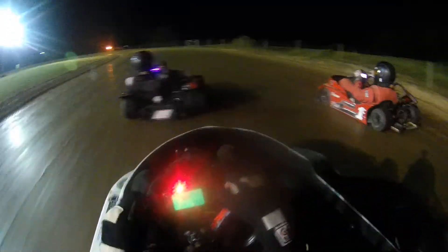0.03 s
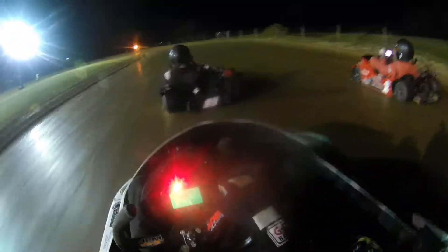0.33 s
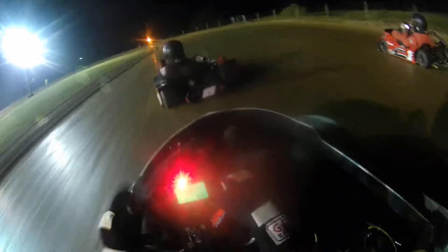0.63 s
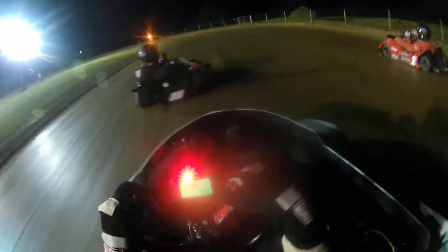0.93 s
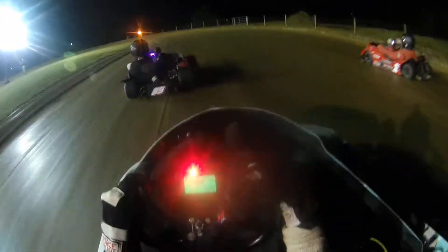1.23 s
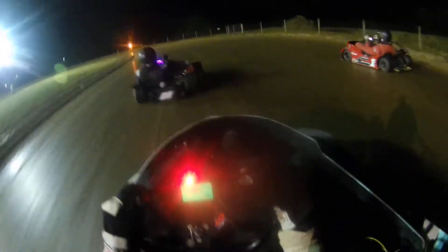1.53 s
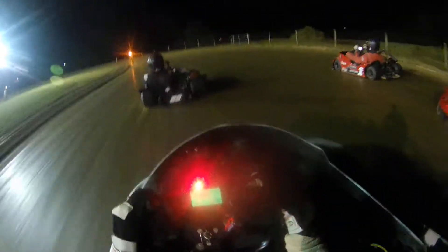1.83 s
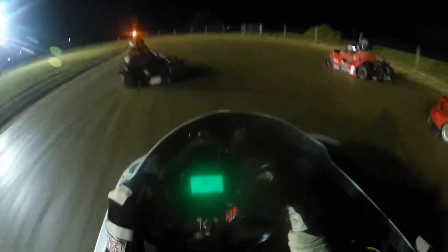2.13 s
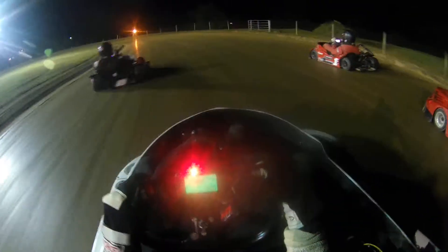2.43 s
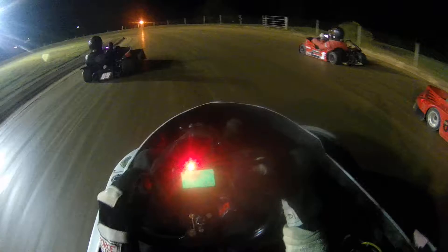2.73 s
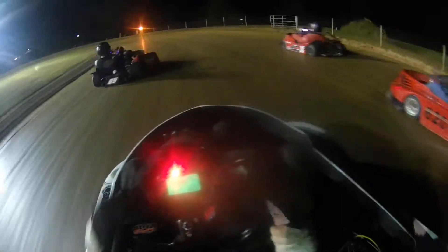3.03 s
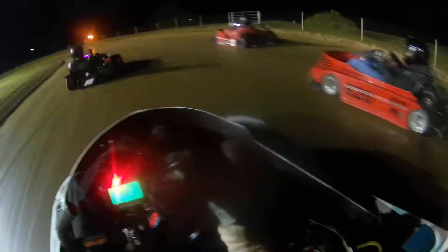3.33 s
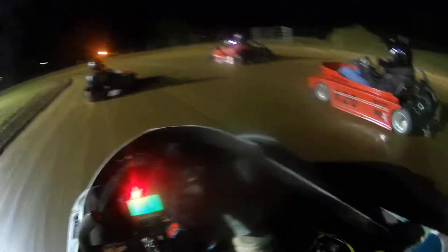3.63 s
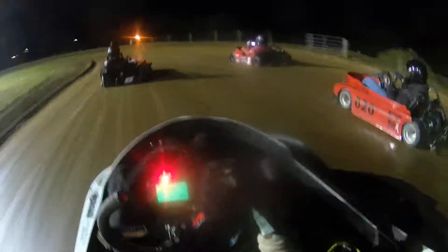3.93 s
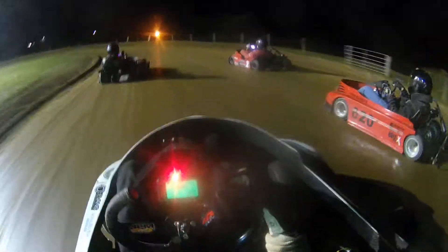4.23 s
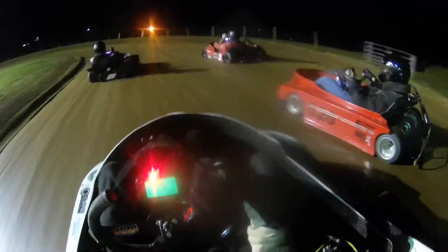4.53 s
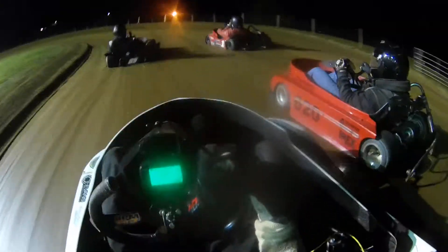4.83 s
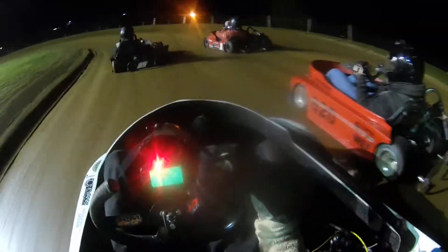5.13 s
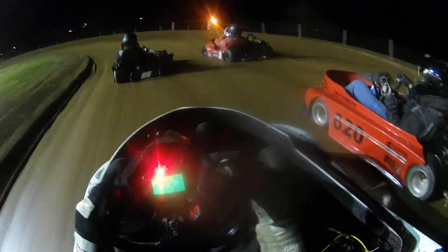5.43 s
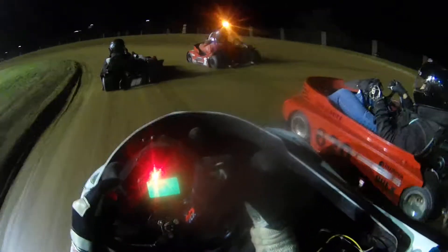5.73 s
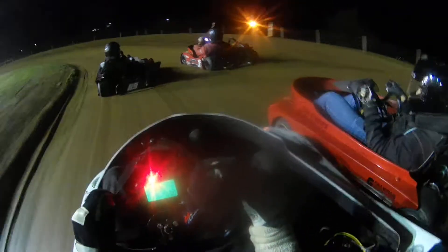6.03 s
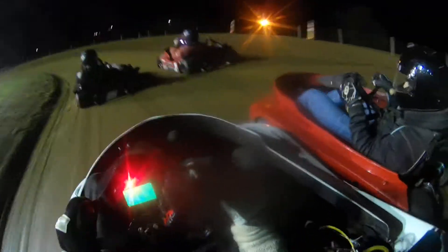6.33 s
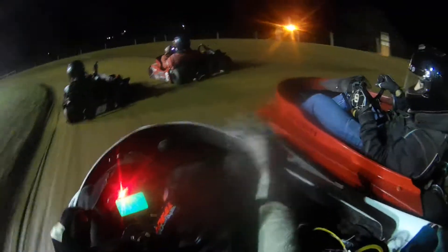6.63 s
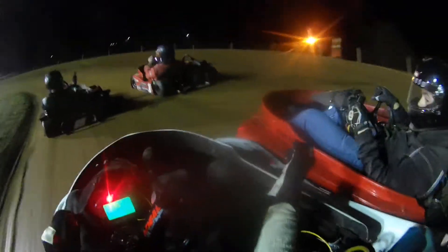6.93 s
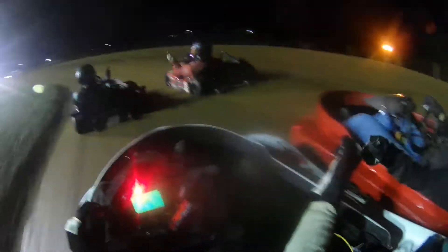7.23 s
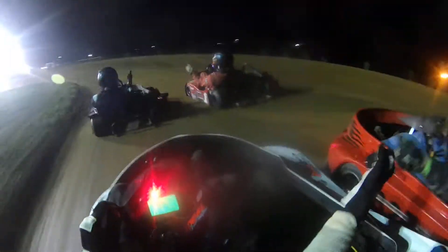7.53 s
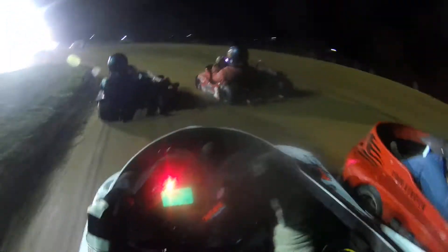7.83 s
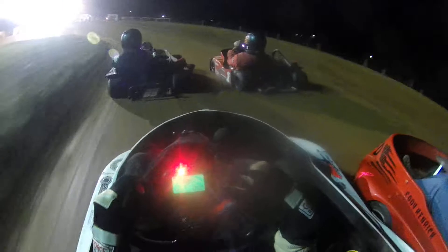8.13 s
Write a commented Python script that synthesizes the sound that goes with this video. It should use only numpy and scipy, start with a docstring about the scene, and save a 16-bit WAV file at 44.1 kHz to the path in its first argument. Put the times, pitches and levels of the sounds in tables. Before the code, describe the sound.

Loud, low wind buffeting drones on a helmet microphone for the whole eight seconds, overloaded and distorted, as a go-kart races on a dirt track. Underneath, its single-cylinder engine throbs, easing around 2.3, 5.8 and 7.5 seconds and picking up again each time. A rival kart's engine swells alongside at about 5.3 and 6.4 seconds, drops back, then returns at the end. Air and tyres add a fluttering hiss, and a faint, thin metallic sizzle comes and goes, clearest near 1.5 and 3.5 seconds. Gusts slap the microphone with short irregular pops, strongest around 2.6, 3.6, 5.3 and 6.5 seconds. Fine dirt ticks lightly against the microphone throughout, with small clusters near 2.8 and 5.2 seconds. The wind softens slightly between 7 and 7.7 seconds, then surges and rises in pitch just after 8 seconds.

```python
"""Heavy, droning wind buffeting on a driver's helmet camera in a night kart race on a dirt oval.
Under it throbs the kart's single-cylinder four-stroke; a rival draws alongside and throws grit.
Air and tyres hiss, a thin sizzle comes and goes, and bursts of wind slap the microphone.
The input is overdriven throughout: the buffeting is squared off, and finer sound
slips through only near its zero crossings."""
import sys
import numpy as np
from scipy import signal
from scipy.fft import rfft, irfft, next_fast_len
from scipy.io import wavfile
from scipy.ndimage import uniform_filter1d, map_coordinates

SR = 44100
rng = np.random.default_rng(int(sys.argv[2]) if len(sys.argv) > 2 else 0)


def materialize(psi):
    """Save the field psi as 16-bit PCM at rate SR to the path in sys.argv[1].

    A 1-D psi becomes a single channel; in a 2-D psi each row is a channel.
    """
    bounded = np.clip(np.atleast_2d(psi).T, -1, 1)
    quanta = np.round(bounded * 32767).astype(np.int16)
    wavfile.write(sys.argv[1], SR, quanta)


N = 369116
TIME = np.arange(N) / SR

# Table levels are relative.
# airflow over the helmet; drives buffeting, rush, spray and hiss: t/s, level/dB
HELMET_AIRFLOW = [(0, 2), (.55, -3.5), (1.38, 1), (2.05, 1.5), (2.3, -5.5), (2.7, 3.5), (3.5, -1), (4.2, 1),
                  (4.45, -1), (5.0, -1), (5.2, 2), (5.4, 1), (5.6, -6), (6.05, -4.5), (6.62, 2.5),
                  (7.1, -5), (7.72, -5.5), (8.08, 5), (8.37, 0)]
# eddy tone, holding or breaking up, climbing at the end: t/s, f/Hz, level/dB
EDDY_TONE = [(0, 175.6, -2), (.12, 170.2, 4), (.3, 165.9, 1), (.54, 154.9, 2), (.75, 206, -1.5),
             (.86, 159.8, -4), (1.08, 197.4, 1.5), (1.16, 152.7, 2.5), (1.3, 194.7, -2), (1.43, 209.5, 0),
             (1.52, 170.3, -0.5), (1.88, 155, 3.5), (2.0, 185.5, -4), (2.15, 210.2, 0), (2.28, 158, -2),
             (2.6, 171.8, -1), (2.9, 188.1, -1), (3.08, 159.4, -2), (3.19, 198, 0), (3.28, 168.2, 0.5),
             (3.5, 208, -1.5), (3.65, 171.8, 0), (3.96, 160.5, -1), (4.05, 195.2, 3.5), (4.28, 194.3, 1),
             (4.42, 158.2, -6.5), (4.85, 152.2, -1.5), (5.08, 175.9, -1.5), (5.25, 174.9, -3.5),
             (5.42, 199.5, -1.5), (5.6, 158, -7), (5.92, 170.2, 0), (6.2, 168, -5.5), (6.5, 168.2, -3.5),
             (6.62, 185, 1), (6.74, 188, -0.5), (6.86, 152.4, -1.5), (7.1, 160.2, -9), (7.4, 150, -8.5),
             (7.62, 177.9, -3.5), (7.82, 138.1, -2.5), (8.05, 173.9, -1.5), (8.22, 198.6, -4.5),
             (8.29, 224, 3), (8.37, 225.5, 5)]
# turbulence at the eddy rate EDDY_REF_HZ: f/Hz, level/dB
TURBULENCE_SPECTRUM = [(15, -22.5), (40, -18.5), (75, -15), (100, -6), (125, -1.5), (165, -2), (205, -1.5),
                       (250, -13.5), (340, -16), (500, -39.5), (900, -60)]
EDDY_REF_HZ = 170.94
# large slow eddies: f/Hz, level/dB
RUMBLE_SPECTRUM = [(15, -10), (45, -8.5), (75, -3.5), (100, 0.5), (120, -1), (170, -20.5), (400, -70.5)]
# air and tyre rush: f/Hz, level/dB
RUSH_SPECTRUM = [(100, -1.5), (300, 9), (480, -6), (700, -15), (1150, -3.5), (2000, -17), (3000, -16),
                 (4500, -29), (6000, -23), (8000, -42), (9900, -25), (12000, -40), (16000, -59)]
# own engine's firing rate, easing and picking up: t/s, f/Hz
OWN_FIRING = [(0, 33.5), (.3, 33.2), (.65, 31.6), (1.45, 34.3), (1.75, 33.0), (2.3, 28.5), (3.5, 34.1),
              (4.3, 32.5), (4.65, 30.1), (5.35, 31.2), (5.8, 29.0), (6.5, 31.3), (7.2, 29.4), (7.7, 29.0),
              (8.37, 32.5)]
# rival's firing rate and level, drawing alongside and dropping back: t/s, f/Hz, level/dB
RIVAL_FIRING = [(0, 31.7, -10.5), (2.4, 25.2, -6), (3.2, 28, -4.5), (5.0, 29.6, -4.5), (5.3, 26, 4),
                (5.65, 25.9, -6.5), (6.4, 28, 1), (7.5, 25.1, -12.5), (8.37, 25.8, 3.5)]
# exhaust note: multiple of the firing rate, level/dB
EXHAUST_ORDERS = [(1, -11), (2, -1), (3, -10.5), (4, -1), (5, 0), (6, 0.5), (7, -11), (8, -9.5), (9, -15),
                  (10, -13), (15, -13.5), (16, -22)]
# exhaust rasp: f/Hz, level/dB
RASP_SPECTRUM = [(150, -11), (390, 2), (495, 5.5), (620, -8), (900, -9), (1300, 1.5), (2000, -11.5),
                 (3000, -17), (5000, -31.5), (8000, -37.5), (10000, -37), (15000, -51)]
# sizzle envelope: t/s, level/dB
SIZZLE_LEVEL = [(0, -1), (.8, -2), (1.5, 4), (2.05, -2), (2.4, -12), (3.0, -3), (3.5, 4.5), (4.3, 0),
                (4.9, -1.5), (6.5, -1.5), (7.3, -8), (8.37, -2)]
# sizzle colour: f/Hz, level/dB
SIZZLE_SPECTRUM = [(6500, -37), (8700, -14), (9900, 0), (11000, -5), (12500, -17), (16000, -25)]
# sharpest slaps of wind, heard as short pops: t/s, level/dB, f/Hz
WIND_SLAPS = [(0.029, -16.5, 1470), (0.443, -19, 800), (1.044, -10, 1030), (1.361, -12, 1400),
              (1.3903, -15, 1240), (1.5673, -3, 1121), (1.926, -8, 1584), (2.012, -8.5, 794),
              (2.522, -1, 870), (2.5564, -16, 1145), (2.589, 2, 800), (2.659, -17, 1130),
              (2.6925, -10, 1225), (2.845, -14, 1810), (2.949, -9, 1475), (3.1746, -18, 1263),
              (3.419, -7, 852.6), (3.595, 2.5, 1251), (3.9218, -14, 1200), (3.9511, -4.5, 1283),
              (4.6895, -9, 1466), (5.1231, -11, 1673), (5.1861, -10, 1370), (5.296, 1, 807.3),
              (5.319, 0.5, 1500), (5.3668, -14, 1600), (5.417, -10, 810), (6.3227, -4, 1049),
              (6.4232, -5, 1114), (6.5772, -3, 1272), (6.6734, -7, 1274), (7.5919, -13, 1089),
              (8.1058, -15, 1403), (8.1426, -4, 1359), (8.202, -13, 850), (8.3543, -17.5, 1289)]
# grit hitting the camera: t/s, level/dB
GRIT_HITS = [(.178, -30), (1.925, -31), (2.752, -28), (2.783, -30), (4.211, -30), (4.821, -31),
             (5.156, -28), (5.185, -28), (5.344, -27), (7.32, -27), (7.514, -32)]
# hiss over the clipped tops: f/Hz, level/dB
HISS_SPECTRUM = [(500, 3), (2000, 3), (4000, -11), (8000, -11), (10000, -10), (12000, -14), (15500, -5.5)]
# response after the input stage: f/Hz, level/dB
TREBLE_RESPONSE = [(5000, -1.5), (8000, -5), (10000, -4), (12000, -8.5), (15500, -11.5)]


def gain_of(db):
    """Decibels to amplitude."""
    return 10 ** (np.asarray(db) / 20)


def unit_rms(x):
    """Scales to rms 1."""
    return x / np.sqrt(np.mean(x ** 2) + 1e-20)


def follow(table):
    """A time table's columns, interpolated to every sample."""
    times_s, *columns = np.transpose(table)
    return [np.interp(TIME, times_s, column) for column in columns]


def filtered(x, spectrum):
    """Filters x by a spectrum table, interpolated in log frequency."""
    size = next_fast_len(N + 2000)
    bins_hz = np.fft.rfftfreq(size, 1 / SR)
    hz, db = np.transpose(spectrum)
    response_db = np.interp(np.log(bins_hz + 1), np.log(hz + 1), db)
    return irfft(rfft(x, size) * gain_of(response_db), size)[:N]


def noise(spectrum):
    """Coloured noise, rms 1."""
    return unit_rms(filtered(rng.standard_normal(N), spectrum))


def wander(rate_hz):
    """Smooth random drift, rms 1, rolling off at rate_hz."""
    size = next_fast_len(N)
    lowpass = np.exp(-(np.fft.rfftfreq(size, 1 / SR) / rate_hz) ** 2)
    return unit_rms(irfft(rfft(rng.standard_normal(size)) * lowpass, size)[:N])


def add(mix, start_s, sound):
    """Adds sound into mix at start_s."""
    part = mix[round(start_s * SR):][:len(sound)]
    part += sound[:len(part)]


def buffeting(tone_db=-6, turbulence_db=-4.5, gust_rate_hz=7, sway_hz=3, jitter_hz=7):
    """Eddies shed from the camera: a drone in a band of turbulence that moves with it."""
    flow_db, = follow(HELMET_AIRFLOW)
    steady_hz, firmness_db = follow(EDDY_TONE)
    eddy_hz = steady_hz + sway_hz * wander(gust_rate_hz)
    level_db = 7 + 0.4 * flow_db + 0.52 * wander(gust_rate_hz)
    turns = np.cumsum(eddy_hz + jitter_hz * wander(25)) / SR
    tone = gain_of(tone_db + firmness_db) * unit_rms(np.sin(2 * np.pi * turns))
    read_at = np.cumsum((eddy_hz / EDDY_REF_HZ) ** 0.3)  # faster air sweeps turbulence past sooner
    turbulence = map_coordinates(noise(TURBULENCE_SPECTRUM), [read_at], order=1, mode="mirror")
    return gain_of(level_db) * (tone + gain_of(turbulence_db) * turbulence)


def rumble(start_db=-11.5, rise_db_per_s=1.26):
    """Large slow eddies below the buffeting, growing through the bend."""
    return gain_of(start_db + rise_db_per_s * TIME) * noise(RUMBLE_SPECTRUM)


def rush(level_db=-16, flutter_db=2):
    """Fluttering hiss of air and tyres; the microphone port rings near 10 kHz."""
    flow_db, = follow(HELMET_AIRFLOW)
    return gain_of(level_db + flow_db + flutter_db * wander(43)) * noise(RUSH_SPECTRUM)


def wind(gust_db=2.9, rush_share=0.12):
    """Quick gusts swell buffeting and rumble together, the rush slightly."""
    swell_db = gust_db * wander(55)
    return gain_of(swell_db) * (buffeting() + rumble()) + gain_of(rush_share * swell_db) * rush()


def engine(firing_hz, level_db, note_db, rasp_db, puff_cycles, unevenness):
    """One cylinder: low exhaust orders plus a rasping gas puff per firing."""
    cycles = np.cumsum(firing_hz * (1 + unevenness * wander(12.03))) / SR
    note = sum(gain_of(db) * np.cos(2 * np.pi * (order * cycles + rng.random()))
               for order, db in EXHAUST_ORDERS)
    puffs = np.exp(-(cycles % 1) / puff_cycles) * gain_of(2 * wander(30))
    rasp = filtered(puffs * rng.standard_normal(N), RASP_SPECTRUM)
    return gain_of(level_db) * (gain_of(note_db) * unit_rms(note) + gain_of(rasp_db) * unit_rms(rasp))


def sizzle(level_db=-42, flutter_db=3):
    """Thin metallic sizzle near 10 kHz, probably the drive chain."""
    swell_db, = follow(SIZZLE_LEVEL)
    return noise(SIZZLE_SPECTRUM) * gain_of(level_db + swell_db + flutter_db * wander(40))


def slapped(sound, gain_db=3, width_s=0.0006, choke_s=0.0011, raggedness=0.12):
    """Each wind slap briefly chokes the microphone port and adds one ragged pressure swing."""
    swings, choke = np.zeros(N), np.zeros(N)
    t = np.arange(-220, 220) / SR
    for at_s, level_db, hz in WIND_SLAPS:
        crack = unit_rms(uniform_filter1d(rng.standard_normal(len(t)), size=9))
        tone = np.sin(2 * np.pi * (hz * t + rng.random()))
        swing = np.exp(-(t / width_s) ** 2) * (tone + raggedness * crack)
        add(swings, at_s + t[0], gain_of(gain_db + level_db) * swing)
        add(choke, at_s + t[0], np.exp(-(t / choke_s) ** 2))
    return sound * (1 - choke) + swings


def spray(smallest_db=-29, ring_s=0.001, base_per_s=30, doubling_db=2.5):
    """Fine dirt from the karts ahead ticks at random, thicker in stronger airflow."""
    flow_db, = follow(HELMET_AIRFLOW)
    specks_per_s = base_per_s * 2 ** (flow_db / doubling_db)
    times_s = TIME[rng.random(N) < specks_per_s / SR]
    out, t = np.zeros(N), np.arange(400) / SR
    for at_s, (smallness, pitch) in zip(times_s, rng.random((len(times_s), 2))):
        level_db = smallest_db - 4 * np.log(smallness + 0.048)  # mostly small, a few large
        hz = 7500 + 7800 * pitch
        add(out, at_s, gain_of(level_db) * np.exp(-t / ring_s) * np.sin(2 * np.pi * hz * t))
    return out


def grit(gain_db=9, ring_hz=9340, ring_s=0.003, pitch_spread=0.05, scrape=0.9):
    """Dirt crumbs skid on the housing: brief bright ticks."""
    out, t = np.zeros(N), np.arange(800) / SR
    for at_s, level_db in GRIT_HITS:
        hz = ring_hz * (1 + pitch_spread * rng.standard_normal())
        tick = np.sin(2 * np.pi * hz * t) + scrape * rng.standard_normal(len(t))
        add(out, at_s, gain_of(gain_db + level_db) * np.exp(-t / ring_s) * tick)
    return out


def scene(cruise_hz=31.76, cruise_db=-3, load_db_per_hz=0.77):
    """Wind and its slaps, two engines, sizzle and flying dirt at the microphone."""
    firing_hz, = follow(OWN_FIRING)
    own_db = cruise_db + load_db_per_hz * (firing_hz - cruise_hz)
    own = engine(firing_hz, own_db, note_db=1.5, rasp_db=-19, puff_cycles=0.047, unevenness=0.00514)
    rival = engine(*follow(RIVAL_FIRING), note_db=-3.5, rasp_db=-17.5, puff_cycles=0.1, unevenness=0.012)
    airborne = wind() + own + rival + sizzle()
    return (slapped(airborne) + grit() + spray())[None]


def clipped(x, ceiling, hardness):
    """Clips with a short rounded knee, 2x oversampled."""
    drive = signal.resample_poly(x, 2, 1) / ceiling
    flattened = drive / (1 + abs(drive) ** hardness) ** (1 / hardness)
    return ceiling * signal.resample_poly(flattened, 1, 2)


def record(dry, coupling_hz=14, hiss_db=-45, cutoff_hz=15900):
    """The input clips hard; a high-pass tilts the flat tops; a second ceiling trims the corners."""
    squared = clipped(dry[0], ceiling=0.78, hardness=47)
    drooping = signal.lfilter(*signal.butter(1, coupling_hz, "high", fs=SR), squared)
    trimmed = clipped(drooping, ceiling=0.715, hardness=30)
    flow_db, = follow(HELMET_AIRFLOW)
    hiss = gain_of(hiss_db + flow_db) * noise(HISS_SPECTRUM)
    dulled = filtered(trimmed + hiss, TREBLE_RESPONSE)
    lowpass = signal.firwin(401, cutoff_hz, window=("kaiser", 8), fs=SR)
    return signal.oaconvolve(dulled, lowpass, "same")[None]


dry = scene()
out = record(dry)
materialize(out)
```